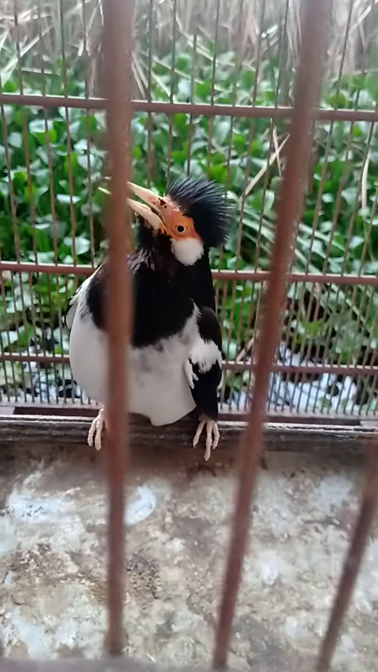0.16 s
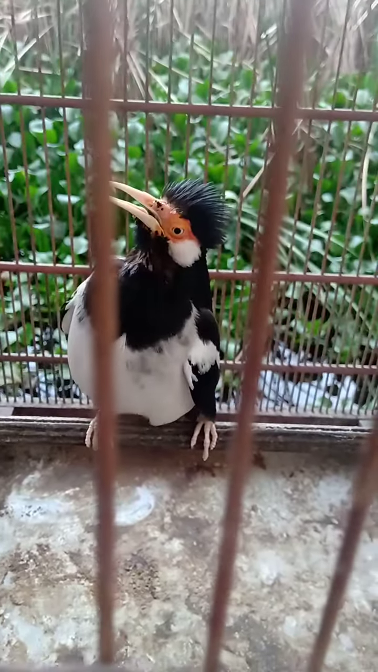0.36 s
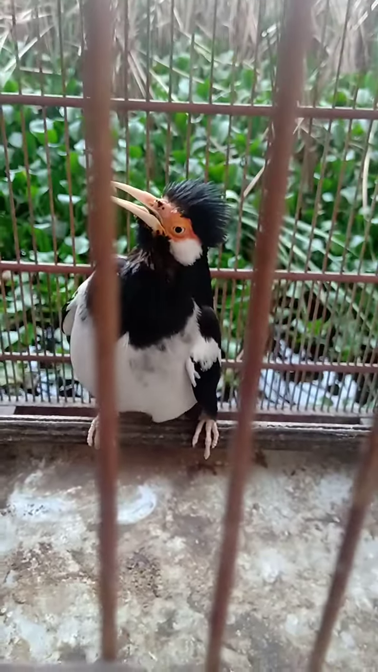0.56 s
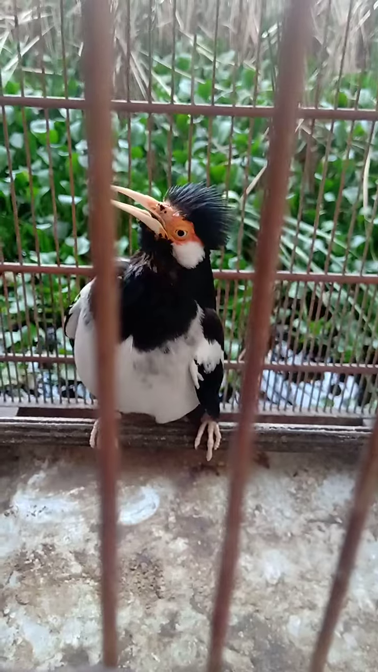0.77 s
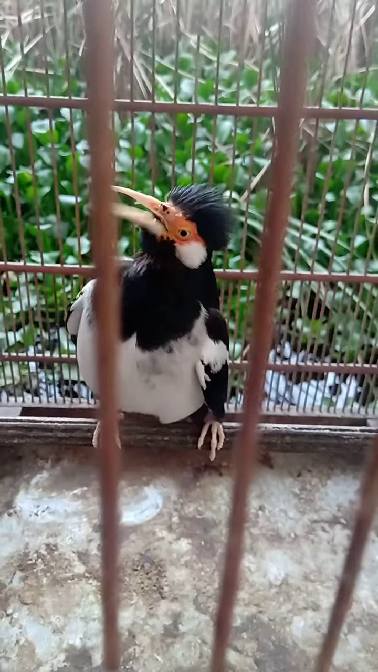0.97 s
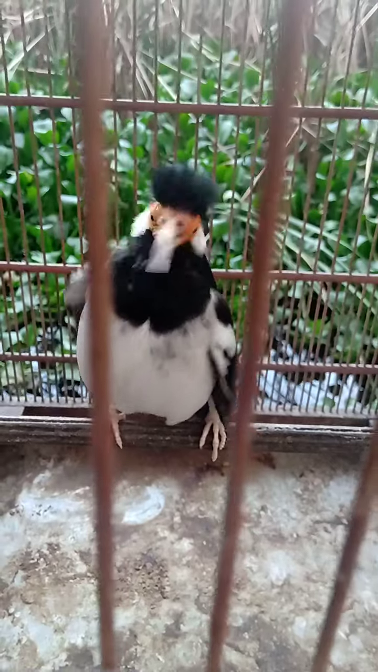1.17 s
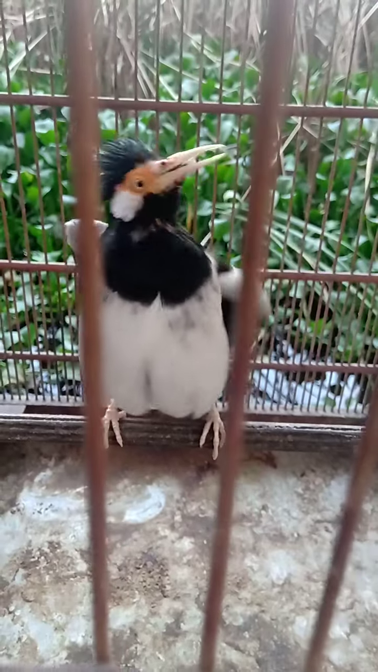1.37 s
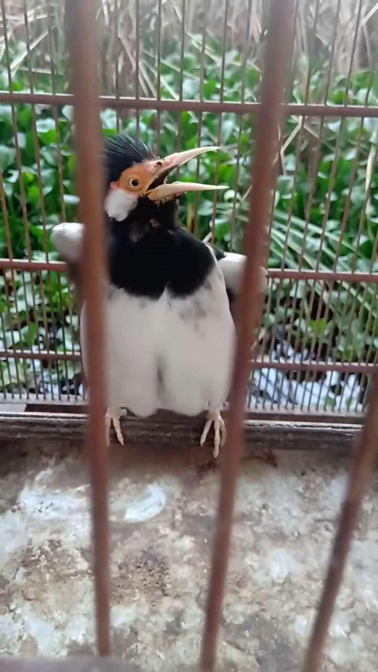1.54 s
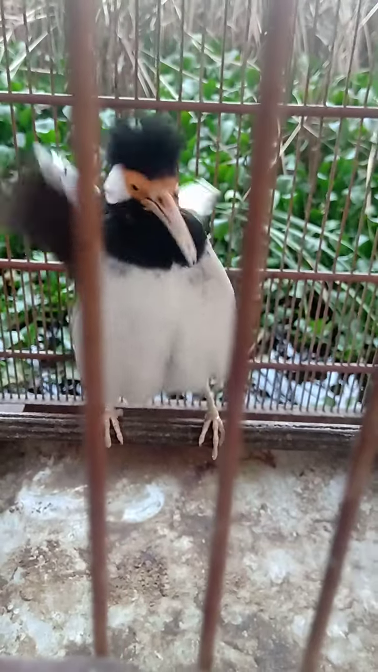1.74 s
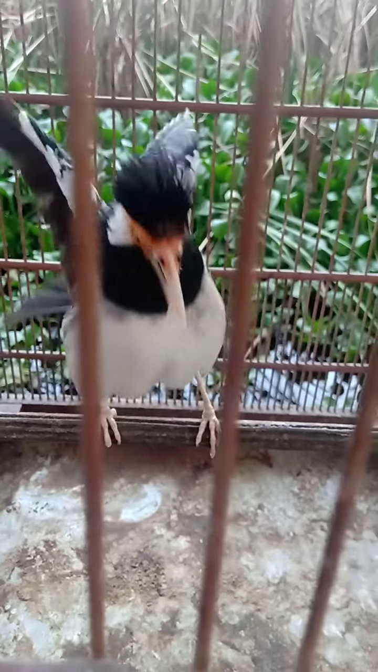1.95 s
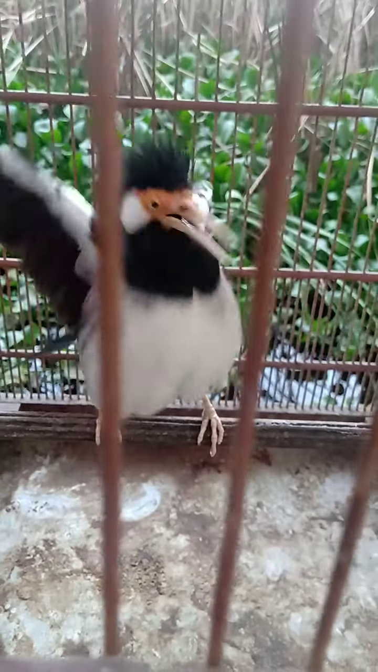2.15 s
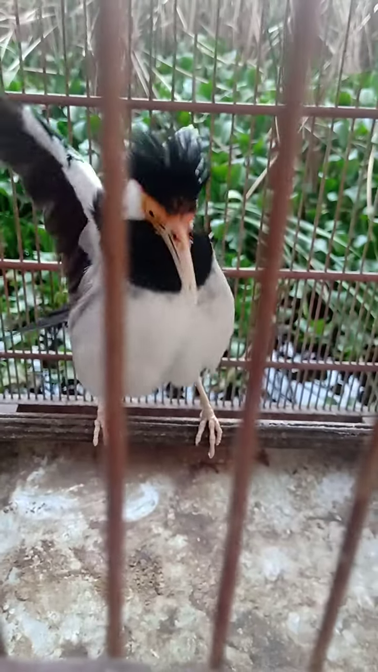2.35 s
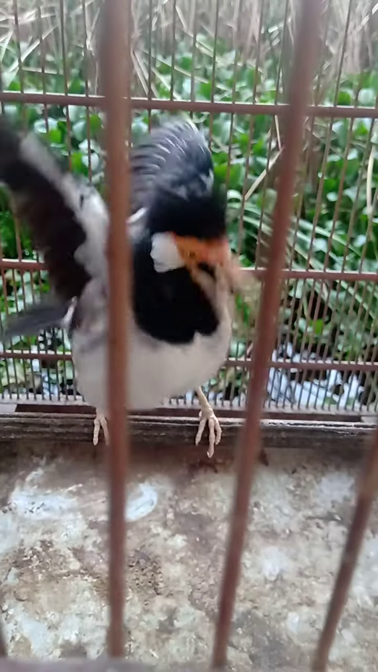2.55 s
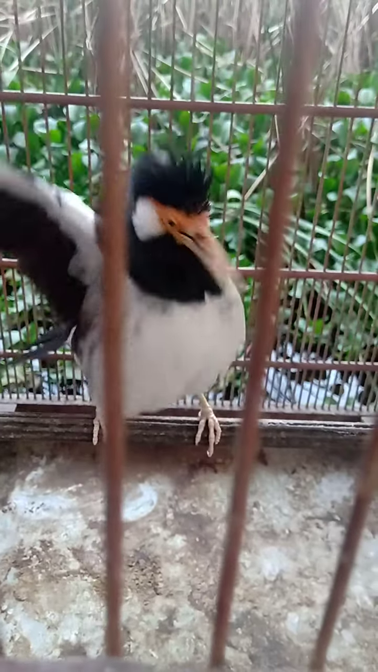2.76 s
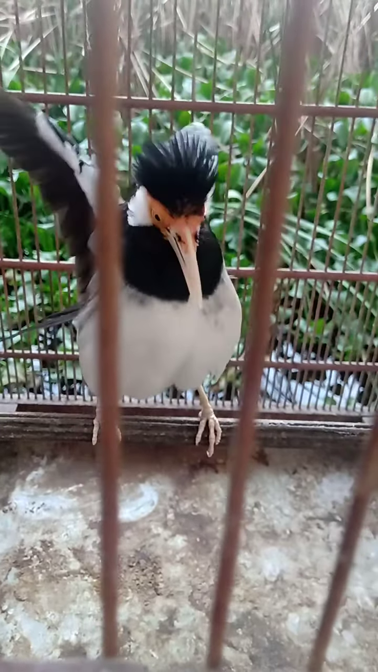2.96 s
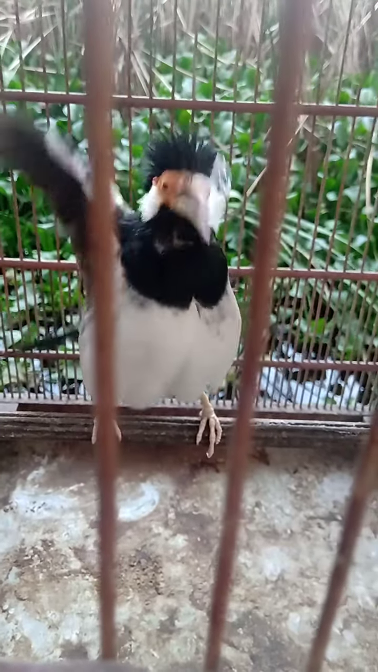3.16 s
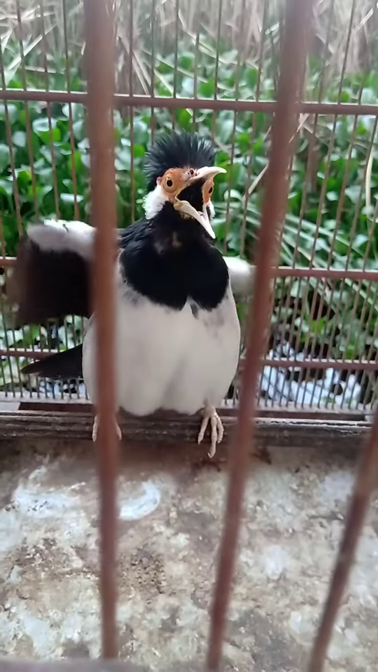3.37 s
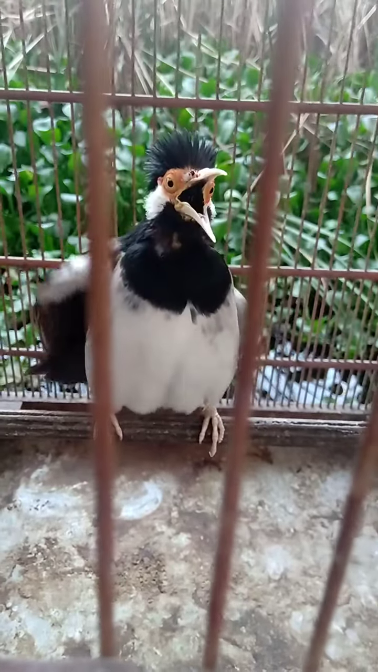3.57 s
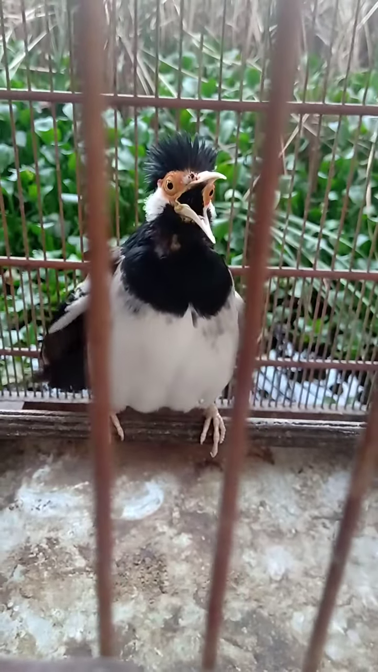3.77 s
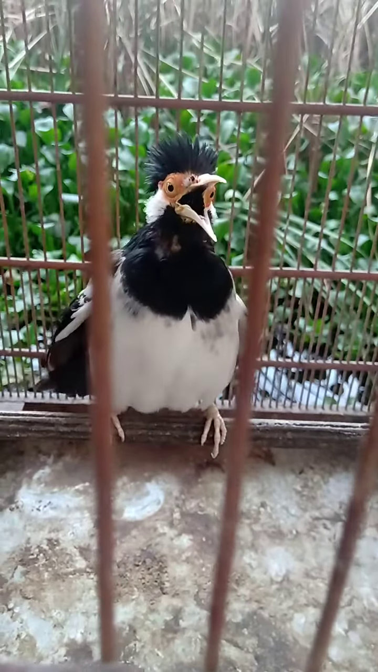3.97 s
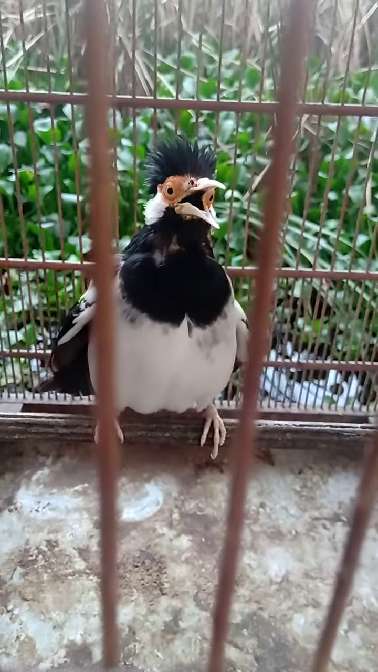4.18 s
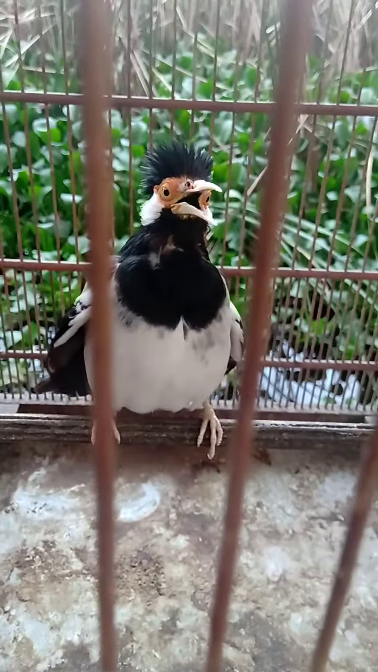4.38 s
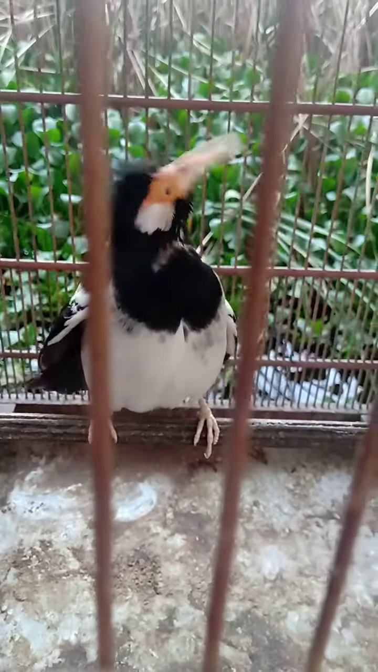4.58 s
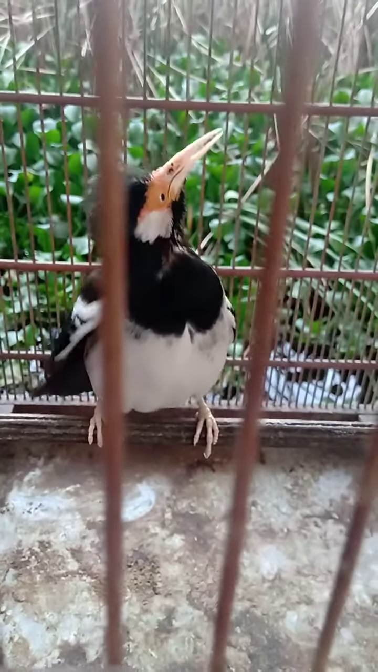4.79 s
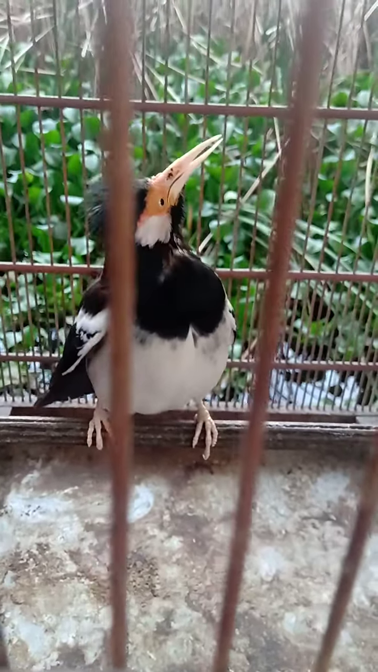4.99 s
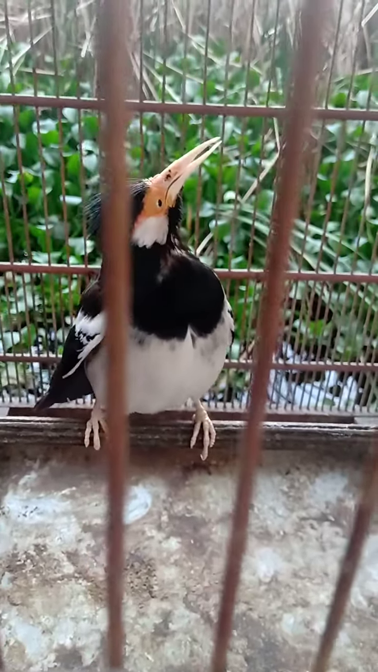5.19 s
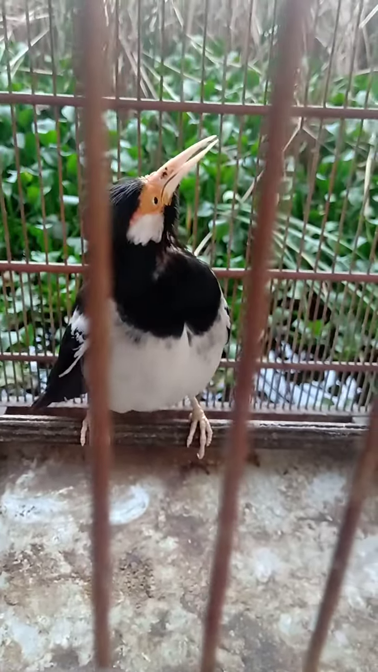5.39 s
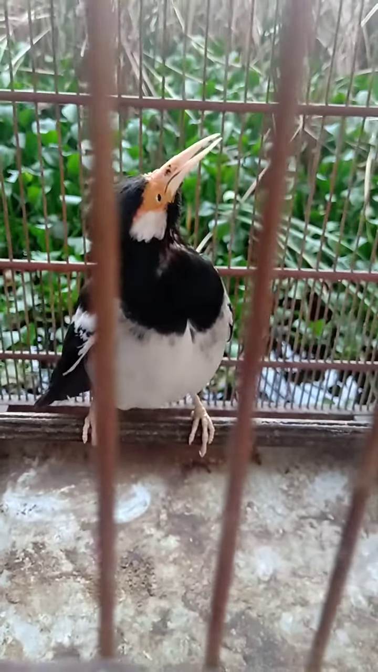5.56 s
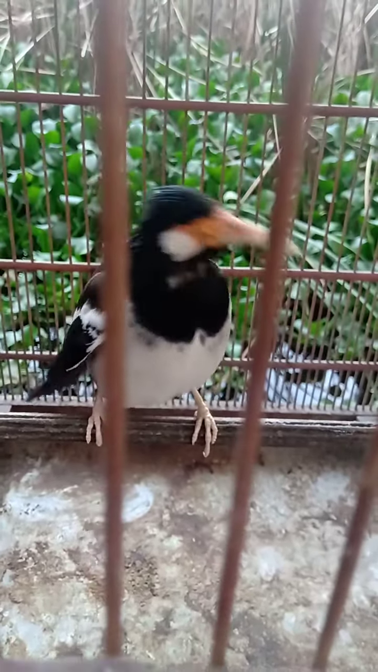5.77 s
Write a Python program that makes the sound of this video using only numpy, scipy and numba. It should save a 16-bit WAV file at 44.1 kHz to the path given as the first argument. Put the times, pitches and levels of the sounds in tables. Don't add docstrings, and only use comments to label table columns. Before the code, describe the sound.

Outdoors in a yard, low traffic rumble, leaf hiss and a faint small motor come first, with soft knocks. A caged starling close to a phone then sings four short rising whistles, each flipping into a high quivering warble. After a pause it rattles out ten stuttering trill notes with a bright short echo. Quiet background returns, with a few muffled knocks and a thin distant bird call.

```python
import sys
import numpy as np
from scipy import signal
from scipy.fft import rfft, irfft
from scipy.io import wavfile
from scipy.ndimage import uniform_filter1d
from numba import njit

SR = 44100
rng = np.random.default_rng(int(sys.argv[2]) if len(sys.argv) > 2 else 0)


def gain_from_db(level_db):
    decades = np.asarray(level_db, float) / 20
    return 10 ** decades


def store_pcm(level_fs):
    pcm = np.round(np.clip(level_fs, -1, 1) * 32767).astype(np.int16)
    wavfile.write(sys.argv[1], SR, np.atleast_2d(pcm).T)


N = 257102
T = np.arange(N) / SR

# start [s], length [s], last pitch [Hz], scoop up from below [Hz], level [dB].
WHISTLES = [
    (0.963, 0.053, 2370, 30, -25),
    (1.412, 0.082, 2282, 528, -18.5),
    (1.937, .081, 2286, 536, -18),
    (2.47, .083, 2294, 453, -18.5),
]
# start [s], upward voice break [s], end [s], top pitch [Hz], level [dB].
WARBLES = [
    (1.019, 1.0165, 1.071, 6360, -17),
    (1.498, 1.502, 1.549, 6080, -19),
    (2.02, 2.025, 2.077, 5927, -18.5),
    (2.555, 2.559, 2.612, 6010, -18),
]
# time [s], pitch [Hz], level [dB], octave relative level [dB].
OPENING = [(3.111, 3076, -37.5, -13), (3.119, 2385, -38.5, 2), (3.125, 2820, -34, 0),
           (3.135, 3375, -27.5, -21), (3.148, 3672, -21, -19.5), (3.158, 3718, -19, -25),
           (3.168, 3680, -33, -25.5), (3.176, 3540, -32.5, -19), (3.179, 3770, -39, -21.5)]
# loudest stutter [s], tone settles after [s], tone length [s], level [dB].
TRILL = [(3.2125, -.0015, 0.046, -19), (3.2969, .0025, .044, -20.5), (3.3854, 0.0045, .041, -20),
         (3.4696, .003, 0.041, -22.5), (3.5596, 0.0042, .038, -22), (3.6433, .0065, 0.037, -23.5),
         (3.7304, .0065, 0.041, -24), (3.8187, 0.0075, 0.035, -22), (3.911, 0.0064, 0.036, -22.5),
         (4.0062, 0.0082, 0.024, -24)]
# share of its length, pitch [Hz], level [dB], octave relative level [dB].
SETTLE = [(0, 3865, -1.5, -20), (.11, 3803, -.5, -22), (.58, 3955, -1.5, -36), (.84, 3985, -5.5, -38),
          (1, 3920, -13, -28)]


def walk(rate_hz):
    hold = int(SR / rate_hz)
    steps = np.repeat(rng.standard_normal(N // hold + 1), hold)
    return 1.325 * uniform_filter1d(uniform_filter1d(steps, hold), hold)[:N]


def at(t, curve):
    return curve[(t * SR + .5).astype(int)]


def colour(points):
    hz, db = np.transpose(points)
    f = np.maximum(np.arange(N // 2 + 1) * SR / N, 1)
    gain = gain_from_db(np.interp(np.log(f), np.log(hz), db, -90, -90))
    x = irfft(rfft(rng.standard_normal(N)) * gain, N)
    return x / x.std()


def sine(hz, db, multiple=1):
    return np.sqrt(2) * gain_from_db(db) * np.sin(2 * np.pi * multiple * np.cumsum(hz) / SR)


def bell(t, centre, width):
    return np.exp(-.5 * ((t - centre) / width) ** 2)


def ramp(t, length):
    return np.clip(t / length, 0, 1)


def sing(out, table, voice, edge_s=0.0022):
    s, *columns = np.transpose(table)
    span = slice(int((s[0] - edge_s) * SR), min(int((s[-1] + edge_s) * SR), N))
    t = T[span]
    fade = np.clip(np.minimum(t - t[0], t[-1] - t) / edge_s, 0, 1)
    out[span] += fade * voice(t, *(np.interp(t, s, c) for c in columns))


def whistle_course(row, outer):
    start, length, end_hz, scoop_hz, db = row
    low_db, high_db, climb_hz_per_s, faint_db = outer
    throat_hz, throat_db_per_hz = 4483, 0.0349
    close_s, close_db, thin_s, thin_db = 0.0049, 15.5, 0.019, 34.5
    open_s, open_outer, low_sag_db_per_s = .016, 1.2, 91.5

    t = np.linspace(0, length, num=40)
    hz = end_hz - climb_hz_per_s * (length - t) - scoop_hz * np.exp(-t / 0.0082)
    late = -faint_db * (1 - ramp(t, open_s) ** 2)
    main = db + .6 * late - throat_db_per_hz * np.maximum(throat_hz - 2 * hz, 0)
    main = main - close_db * ramp(t - length + close_s, close_s)
    thin = -thin_db * ramp(t - length + thin_s, thin_s)
    low = low_db + open_outer * late - low_sag_db_per_s * (t - .03) + 0.36 * thin
    high = high_db + open_outer * late + thin
    return np.transpose([start + t, hz, main, low - main, high - main])


def whistles(out, flutter, drift, grain):
    # 1st harmonic [dB], 3rd harmonic [dB], even climb [Hz/s], faint start [dB].
    outer = [
        (-45.5, -36.5, 1530, 0),
        (-44, -34, 2700, 3),
        (-40.5, -28.5, 3200, 10),
        (-43.5, -33.5, 2800, 11),
    ]

    def voice(t, hz, db, low, high):
        low_close = 30 * np.clip((t - t[-1]) / 0.0096 + 1, 0, 1)
        second = sine(hz, db + .5 * at(t, flutter), multiple=1.978)
        first = sine(hz + 20 * at(t, grain), db + low + 2.8 * at(t, drift) - low_close)
        third = sine(hz + 18 * at(t, grain), db + high + 2.8 * at(t, flutter), multiple=2.98)
        fourth = sine(hz, db + high - 8.5 - np.maximum(hz - 1900, 0) / 6, multiple=3.98)
        return second + first + third + fourth

    for row, row_outer in zip(WHISTLES, outer):
        sing(out, whistle_course(row, row_outer), voice)


def warble_course(row):
    start, leap, end, top_hz, db = row
    below_hz, leap_share, leap_s, rise_s = 4580, .45, .0025, .045
    hesitate_db, close_s, close_db = 2.5, 0.0085, 16.5
    t = np.linspace(start, end, num=60)
    after = np.maximum(t - leap, 0)
    ease = 1 - np.exp(-after / rise_s)
    risen = leap_share * (1 - np.exp(-after / leap_s)) + (1 - leap_share) * ease / ease[-1]
    level = db - hesitate_db * np.exp(-after / leap_s) - close_db * ramp(t - end + close_s, close_s)
    return np.transpose([t, below_hz + (top_hz - below_hz) * risen, level])


def warbles(out, flutter, drift, grain):
    # start [s], rate [Hz], early swing [Hz], late swing [Hz].
    quiver = [
        (1.0224, 222, 480, 70),
        (1.5035, 225, 330, 110),
        (2.0255, 237, 320, 220),
        (2.5595, 241, 250, 160),
    ]
    for row, (start, rate_hz, early_hz, late_hz) in zip(WARBLES, quiver):
        def voice(t, hz, db):
            swing_hz = late_hz + (early_hz - late_hz) * np.exp(-(t - start) / .018)
            swing_hz = np.clip((t - start) / .001, 0, 1) * swing_hz
            turn = 2 * np.pi * rate_hz * (t - start) + .25 * at(t, drift)
            db = db + swing_hz / 100 * np.cos(turn) + 1.4 * at(t, flutter) + 1.1 * at(t, grain)
            return sine(hz + swing_hz * np.sin(turn), db)
        sing(out, warble_course(row), voice)


def opening_note(out, flutter, grain):
    def voice(t, hz, db, octave):
        tone = sine(hz + 30 * at(t, grain), db + .6 * at(t, flutter))
        return tone + sine(hz, db + octave + 2.7 * at(t, flutter), multiple=2)
    sing(out, OPENING, voice)


def chips(out, flutter, drift):
    chip_db = [-40, -32.5, -29, -35, -25.5, -28.5, -35.5, -25.5, -32.5, -30.5]
    lead_s, hz, tail_db, tail_octave_db = .0143, 3009, -44.5, -37.5

    def voice(t, f, a, b):
        tone = sine(f, a + 3 * at(t, flutter))
        octave = sine(f, b + 3 * at(t, drift), multiple=1.99)
        return tone + octave + sine(f, b - 9 - np.abs(f - 2300) / 25, multiple=2.6)

    for note, db in zip(TRILL, chip_db):
        s, octave_db = note[0] - lead_s, db - 0.5
        course = [(s - .002, hz, db + 0.5, octave_db - 3.5),  # (s, Hz, dB, octave dB)
                  (s, hz, db + 1.5, octave_db + 6.0),
                  (s + .002, .96 * hz, db - 11.5, octave_db - 11),
                  (s + .004, .78 * hz, tail_db, tail_octave_db),
                  (s + .008, .75 * hz, tail_db - 2, tail_octave_db),
                  (s + 0.011, 1.0 * hz, tail_db + 7, tail_octave_db - 12.5)]
        sing(out, course, voice, edge_s=.001)


def stutter_rows():
    # time from the loudest [s], pitch [Hz], level [dB], puff level [dB].
    stutter = [
        (-.005, 3794, -21.5, -29.5),
        (0, 3952, -15.5, -33),
        (.0049, 3885, -19.5, -36),
    ]
    spread = (.0004, 50, 1, 3)  # s, Hz, dB, dB
    rows, kept = [], []
    for peak_s, delay_s, length_s, _ in TRILL:
        tone_s = max(delay_s, 0) + SETTLE[1][0] * length_s / 2
        for s, hz, db, puff_db in stutter:
            rows.append((peak_s + s, hz, db, puff_db))
            kept.append(s < tone_s)
    rows = np.array(rows)
    return (rows + rng.standard_normal(rows.shape) * spread)[kept]


def stutters(out, breath):
    for s, hz, db, puff_db in stutter_rows():
        span = slice(int((s - .006) * SR), int((s + .006) * SR))
        t = T[span]
        out[span] += bell(t, s, 0.00075) * sine(hz + 150500.0 * (t - s), db)
        out[span] += gain_from_db(puff_db + 0.5) * bell(t, s, 0.0022) * breath[span]


def trill_tones(out, flutter, drift, grain):
    def voice(t, hz, db, octave):
        since = t - t[0]
        ripple = np.exp(-since / 0.025) * np.sin(2 * np.pi * 205 * since + 1.3 * at(t, drift))
        pitch = hz + 80 * ripple + 35 * at(t, drift) + 70 * at(t, grain)
        tone = sine(pitch, db + 1.7 * ripple + 1.3 * at(t, flutter))
        return tone + sine(pitch, db + octave + 4 * at(t, flutter), multiple=1.93)

    for s, delay, length, db in TRILL:
        course = [(s + delay + share * length, hz, db + level_db, octave_db)
                  for share, hz, level_db, octave_db in SETTLE]
        sing(out, course, voice)


def rasps(out, breath):
    # time [s], length [s], level [dB].
    rasp = [(0.972, .008, -50.5), (1.016, .012, -48.5), (1.43, 0.013, -35), (1.512, 0.0065, -55.5),
            (1.946, .016, -44), (3.17, 0.026, -33), (3.198, .012, -46.5), (3.217, .012, -44),
            (2.63, .008, -64.5), (2.03, 0.19, -57.5), (2.2, 0.092, -62.5), (.964, .004, -49.5),
            (1.1, .06, -57.5)]
    for s, length, db in rasp:
        span = slice(int((s - 2 * length) * SR), int((s + 2 * length) * SR))
        out[span] += gain_from_db(db) * bell(T[span], s, length / 3) * breath[span]


def starling():
    out, flutter, drift, grain = np.zeros(N), walk(300), walk(200), walk(1500)
    breath = colour([(1500, -34.5), (2500, 0.5), (3500, 7.5), (5000, 5), (6200, 7.5), (7500, -3.5), (8500, -40)])
    whistles(out, flutter, drift, grain)
    warbles(out, flutter, drift, grain)
    opening_note(out, flutter, grain)
    chips(out, flutter, drift)
    stutters(out, breath)
    trill_tones(out, flutter, drift, grain)
    rasps(out, breath)
    return out


def cage(song):
    # delay [s], level [dB].
    bars = [(.0011, -27.5), (.0023, -25.5), (.0041, -25), (.0067, -15.5)]
    return sum(gain_from_db(db) * np.interp(T - lag, T, song) for lag, db in bars)


def facing_db():
    turns = [(row[0], 3) for row in WHISTLES]
    turns += [(row[1], 5.5) for row in WARBLES]
    turns += [(OPENING[0][0], 10)]
    s, db = np.transpose(sorted(turns))
    return uniform_filter1d(db[np.maximum(np.searchsorted(s, T) - 1, 0)], size=int(.004 * SR))


def echoes(x, db):
    t60_s = 0.38
    t = T[:int(.6 * SR)]
    tail = np.diff(rng.standard_normal(len(t) + 1)) * np.exp(-np.log(1000) * t / t60_s)
    tail = tail * np.clip(t / 0.011, 0, 1)
    return gain_from_db(db) * signal.fftconvolve(x, tail / np.sqrt(np.sum(tail ** 2)) / 4)[:N]


def knocks():
    # start [s], peak level [dB], mode [Hz], t60 [s].
    blows = [(.42, -52, 675, 0.16), (.6, -57, 695, 0.33), (0.661, -34.5, 134, 0.12),
             (0.923, -33.5, 108, 0.073), (2.175, -50.5, 664, 0.33), (2.425, -48.5, 653, .14),
             (2.671, -43, 101, 0.17), (4.16, -52.5, 337, 0.46), (4.41, -40, 150, 0.053),
             (4.93, -43, 574, 0.089), (5.065, -41, 583, 0.083)]
    out = np.zeros(N)
    for s, db, hz, t60 in blows:
        t = np.maximum(T - s, 0)
        decay = (1 - np.exp(-t / 0.0023)) * np.exp(-np.log(1000) * t / t60)
        out += gain_from_db(db) * decay * np.sin(2 * np.pi * hz * t)
    return out


def far_animals():
    # time [s], pitch [Hz], level [dB].
    calls = [
        [(1.87, 6170, -61), (1.9, 6600, -49), (1.93, 6730, -60.5)],
        [(4.37, 5500, -60), (4.41, 6100, -50), (4.46, 6750, -52)],
        [(5.6, 4600, -49), (5.625, 4920, -44), (5.665, 5250, -37), (5.695, 5680, -39), (5.745, 5990, -43),
         (5.79, 6070, -50)],
    ]
    # time [s], pitch [Hz], level [dB].
    crow_course = [(2.92, 623, -81), (3.08, 612, -67.5), (3.17, 640, -44), (3.24, 636, -60),
                   (3.6, 577, -77), (4.1, 522.4, -61.5), (4.35, 510, -59), (4.42, 516, -72.5),
                   (4.68, 528, -65)]
    birds, crow, rough = np.zeros(N), np.zeros(N), walk(60)

    def crow_voice(t, hz, db):
        tone = sine(hz + 9 * np.interp(t, T, rough), db)
        return tone + sine(hz, -66 - 40 * np.abs(t - 2.99) / .5, multiple=3)

    for call in calls:
        sing(birds, call, lambda t, hz, db: sine(hz + 35 * np.interp(t, T, rough), db), edge_s=0.0043)
    sing(crow, crow_course, crow_voice, edge_s=.03)
    birds = .33 * birds * gain_from_db(4 * walk(150)) + echoes(birds * gain_from_db(4 * walk(400)), 7.5)
    return birds + crow * gain_from_db(3.9 * walk(40))


def small_motor():
    # harmonic number, level [dB].
    harmonics = [(2, -2), (4, -4), (5, -2), (6, -1), (7, -4), (12, -16)]
    # time [s], level [dB].
    away = [(0, -52), (1.4, -53.5), (2.3, -65.5), (2.8, -85), (3.7, -81), (4.201, -60.5), (4.75, -81),
            (5.83, -61.5)]
    firing_hz = 58.1 * (1 + .008 * walk(8) + .015 * walk(40))
    tone = sum(sine(firing_hz + 1.606 * walk(30), db - 6.5 + 2.4 * walk(25), multiple=k) for k, db in harmonics)
    return tone * gain_from_db(np.interp(T, *np.transpose(away)))


def passing_hum():
    # centre [s], width [s], level [dB].
    swells = [(.7, 0.098, -52.5), (2.701, 0.59, -60), (4.86, .16, -50.5), (5.17, .1, -57),
              (5.49, 0.028, -50)]
    level = sum(gain_from_db(db) * bell(T, s, width) for s, width, db in swells) + gain_from_db(-78.5)
    return sine(70 * (1 + .05 * walk(44)), 20 * np.log10(level) + 2 * walk(15))


def traffic(lift_db):
    # frequency [Hz], density [dB per Hz].
    spectrum = [(12, -72), (20, -28.5), (27, -27.5), (51, -11.5), (75, 0), (145, -4.5), (177, -10.5),
                (383, -13.5), (612, -20), (1100, -30), (1430, -56.5), (2420, -120)]
    low = colour([p for p in spectrum if p[0] < 200] + [(300, -60)])
    rumble = colour(spectrum) + .5 * low * gain_from_db(2.1 * walk(20))
    return rumble * gain_from_db(-52.5 + lift_db - 2.5 + 1.5 * walk(10))


def leaves(lift_db):
    # frequency [Hz], density [dB per Hz].
    spectrum = [(530, -32), (900, -9), (989, -10), (1230, -7), (1500, -2.5), (2780, -1.5), (3260, -2),
                (4020, 0), (4460, 1), (6460, 2), (7580, -3), (7800, -12), (8660, -40), (11300, -72),
                (19100, -120)]
    return colour(spectrum) * gain_from_db(-55 + 0.48 * lift_db + .6 * walk(6))


def surroundings():
    # time [s], lift [dB].
    lift = [(0, 2.5), (.5, 0.5), (.75, 0), (1.8, -1), (2.3, 0), (2.9, -1), (3.2, 2.5), (4.2, 0),
            (5.83, 0.5)]
    lift_db = np.interp(T, *np.transpose(lift))
    return traffic(lift_db) + leaves(lift_db) + small_motor() + passing_hum()


@njit
def follow(level_db, rise, fall):
    e, out = -80., np.empty(len(level_db))
    for i in range(len(level_db)):
        e += (level_db[i] - e) * (rise if level_db[i] > e else fall)
        out[i] = e
    return out


def excess_db(near):
    threshold_db, rise_s, fall_s = -41, 0.037, 0.046
    power = np.abs(uniform_filter1d(near ** 2, size=256))
    loud_db = 10 * np.log10(power + gain_from_db(2 * threshold_db - 26))
    return np.maximum(follow(loud_db, 1 / (rise_s * SR), 1 / (fall_s * SR)) - threshold_db, 0)


def scene():
    song = starling()
    near = song + cage(song)
    over_db = excess_db(near)
    sway_db = 3 * walk(500)
    yard = echoes(song * gain_from_db(facing_db() + sway_db - 1.5), -8)
    yard = yard * gain_from_db(-0.13 * over_db)
    rest = (surroundings() + far_animals() + knocks()) * gain_from_db(-0.92 * over_db)
    return (near + yard + rest)[None]


def roll_off(x):
    return signal.sosfilt(signal.butter(12, 8810, fs=SR, output="sos"), x)


def record(dry):
    lowpass = signal.ellip(8, .2, 60, 8450, fs=SR, output="sos")
    mix = signal.sosfilt(lowpass, dry)
    return roll_off(mix)


dry = scene()
out = record(dry)
store_pcm(out)
```